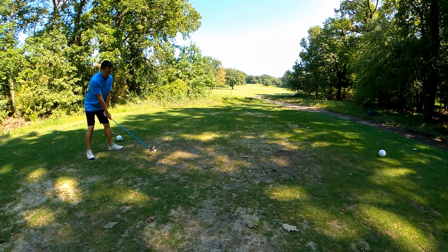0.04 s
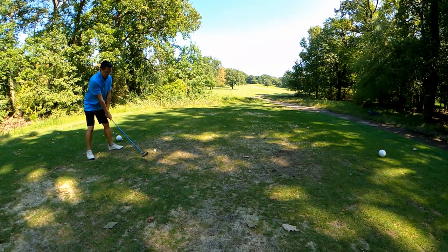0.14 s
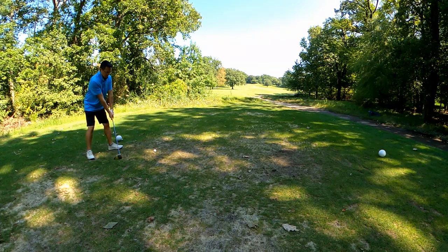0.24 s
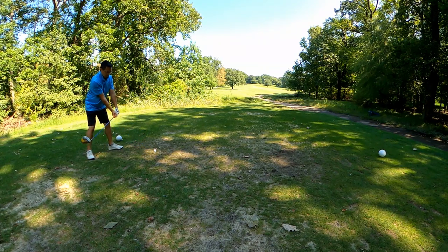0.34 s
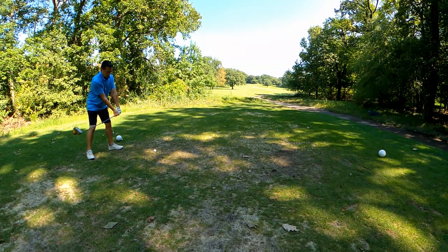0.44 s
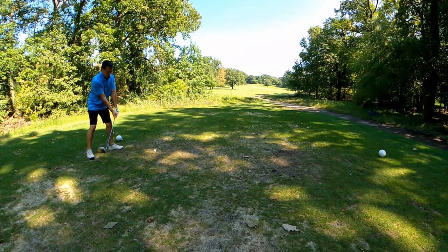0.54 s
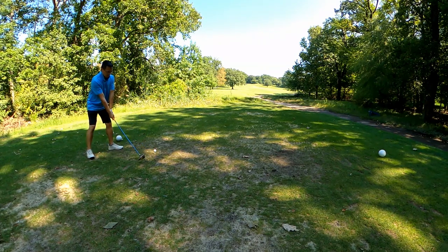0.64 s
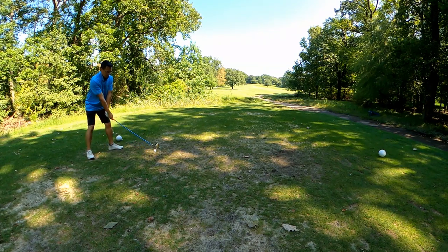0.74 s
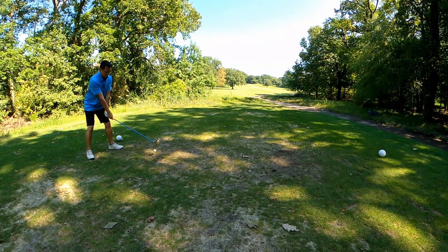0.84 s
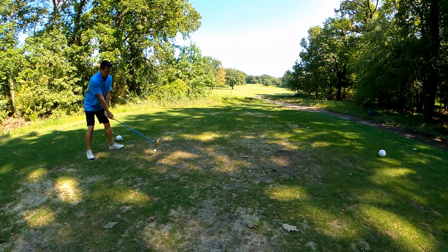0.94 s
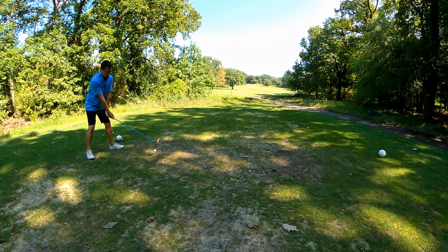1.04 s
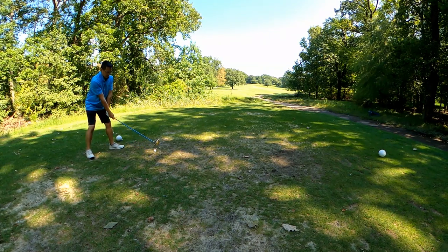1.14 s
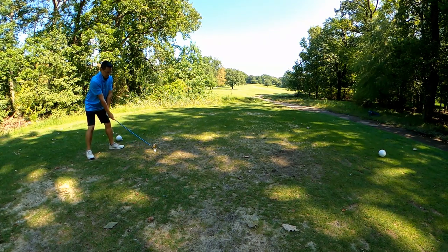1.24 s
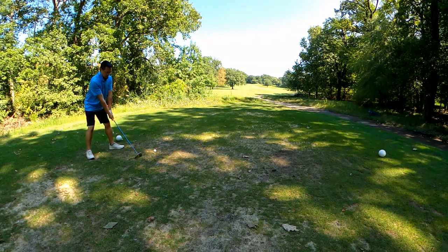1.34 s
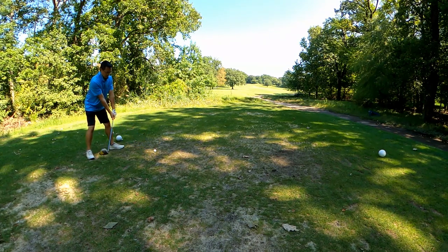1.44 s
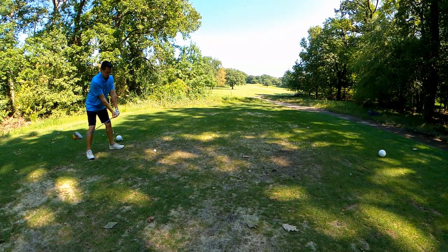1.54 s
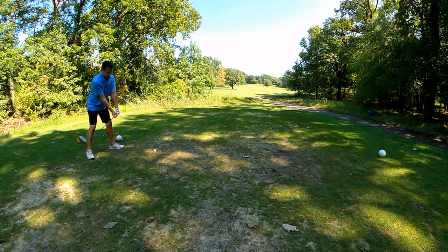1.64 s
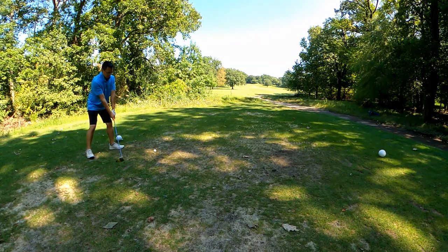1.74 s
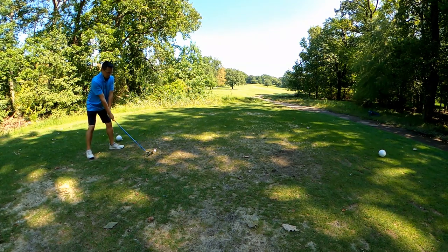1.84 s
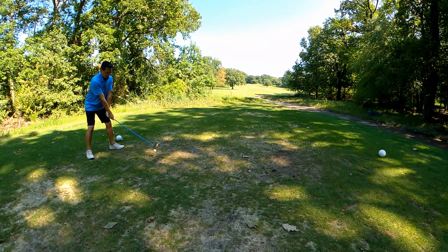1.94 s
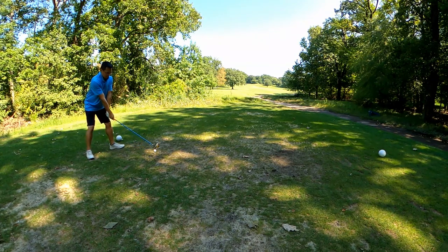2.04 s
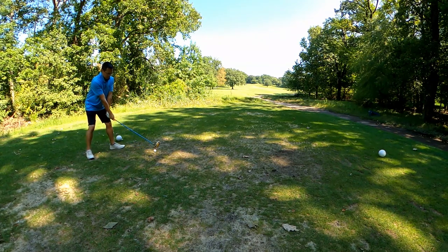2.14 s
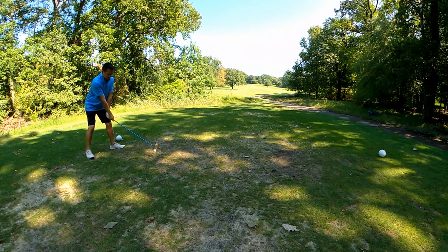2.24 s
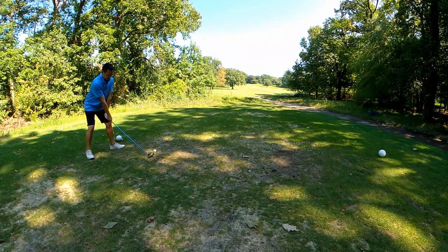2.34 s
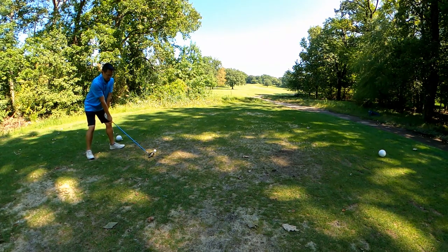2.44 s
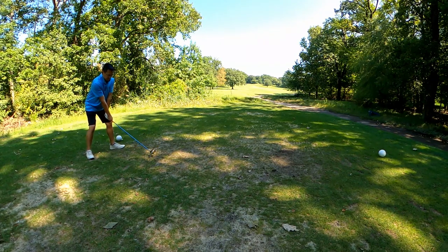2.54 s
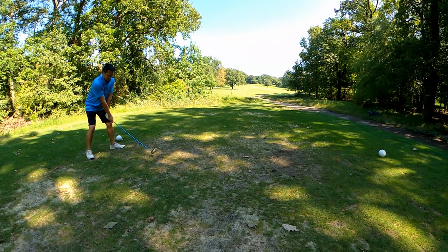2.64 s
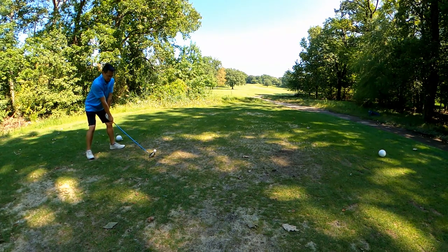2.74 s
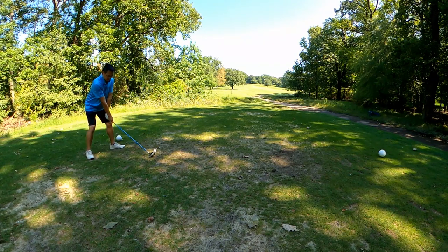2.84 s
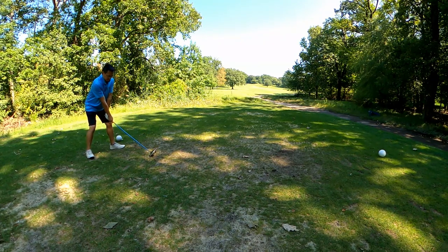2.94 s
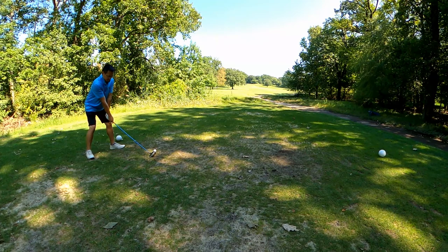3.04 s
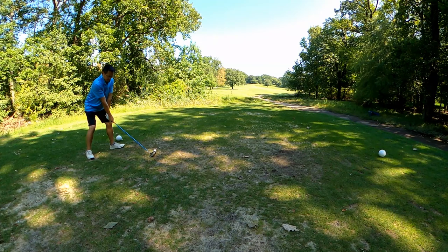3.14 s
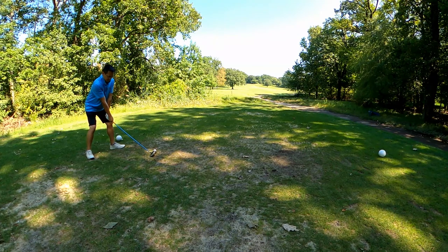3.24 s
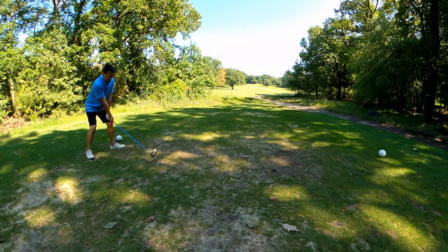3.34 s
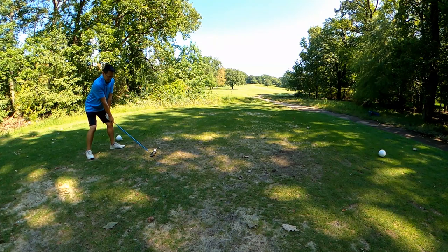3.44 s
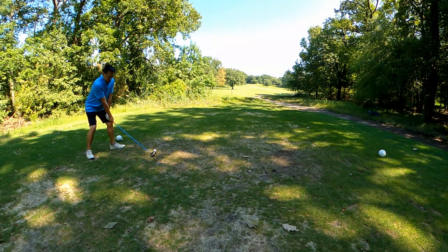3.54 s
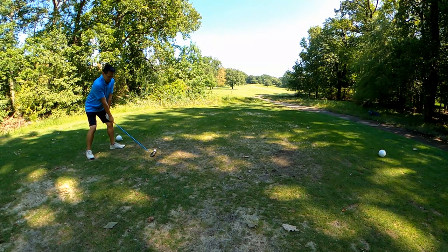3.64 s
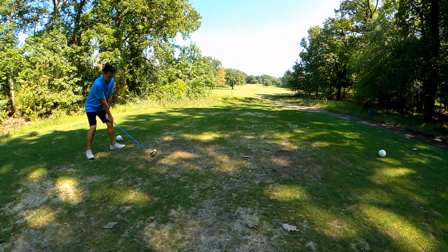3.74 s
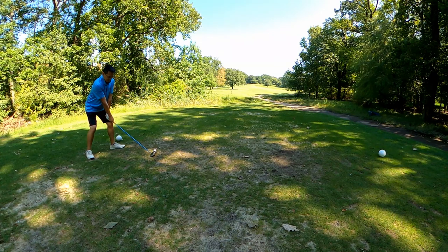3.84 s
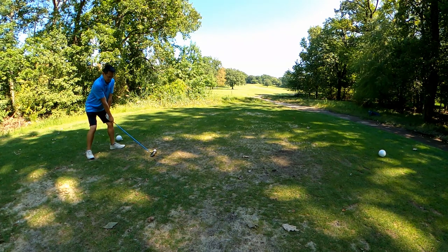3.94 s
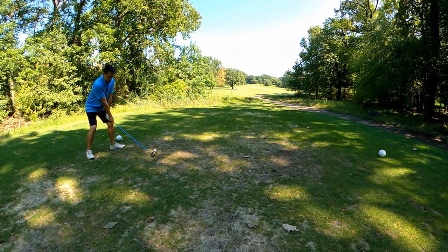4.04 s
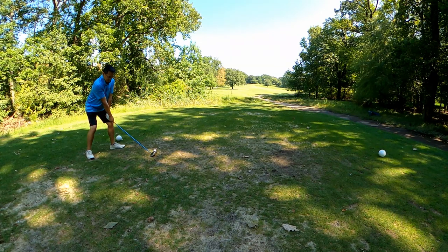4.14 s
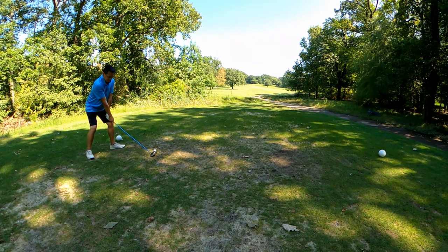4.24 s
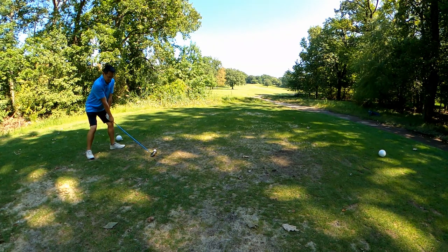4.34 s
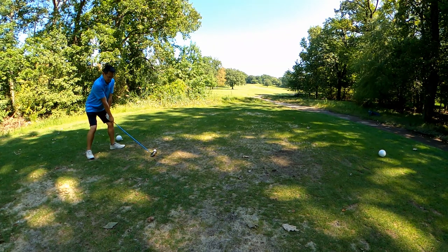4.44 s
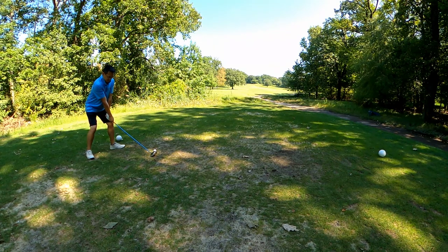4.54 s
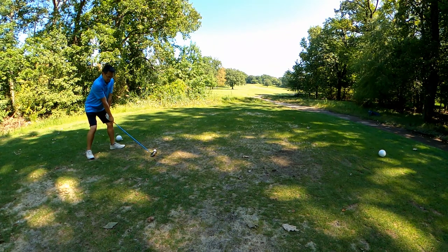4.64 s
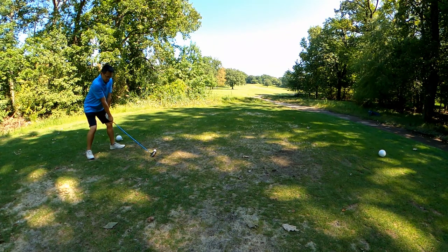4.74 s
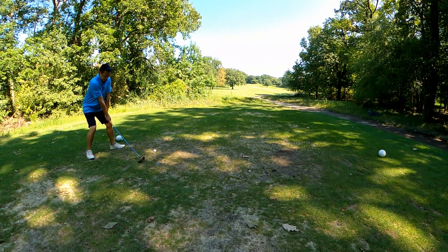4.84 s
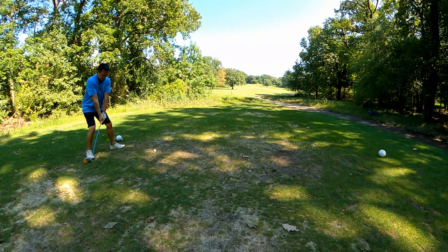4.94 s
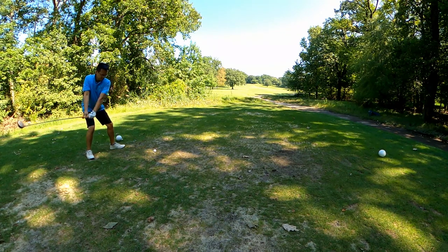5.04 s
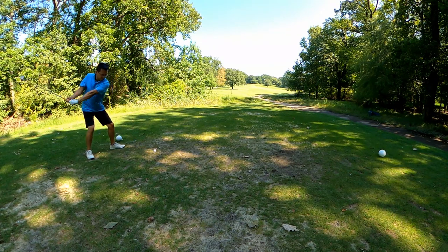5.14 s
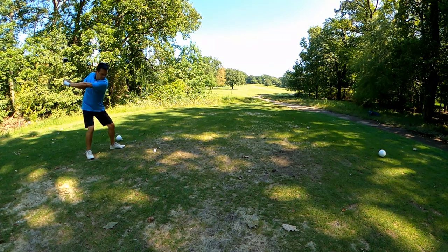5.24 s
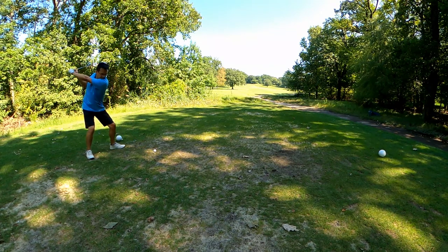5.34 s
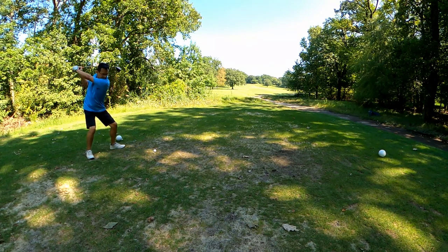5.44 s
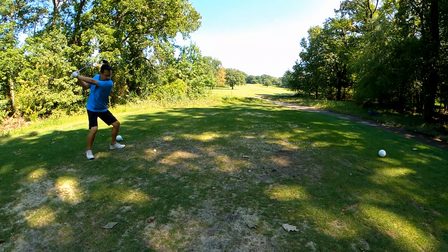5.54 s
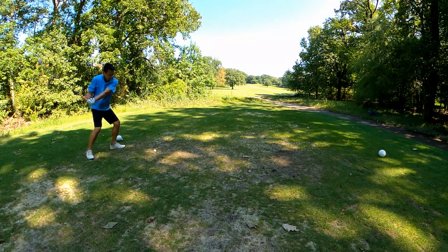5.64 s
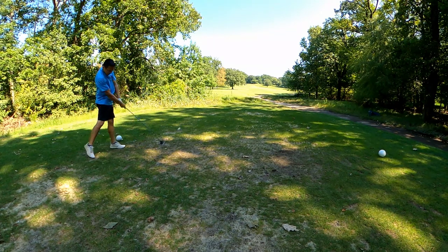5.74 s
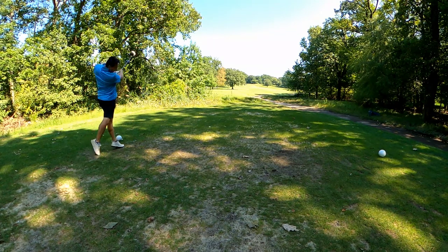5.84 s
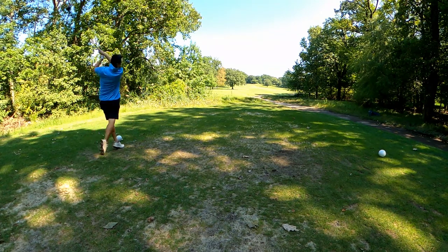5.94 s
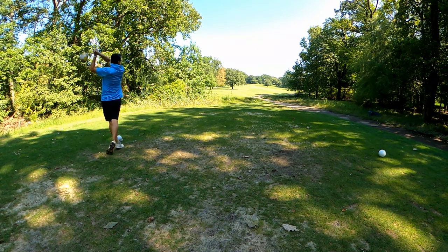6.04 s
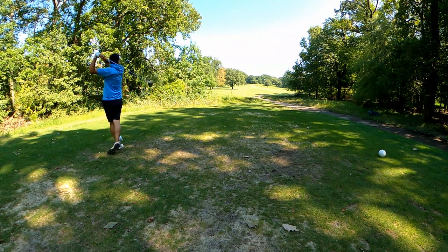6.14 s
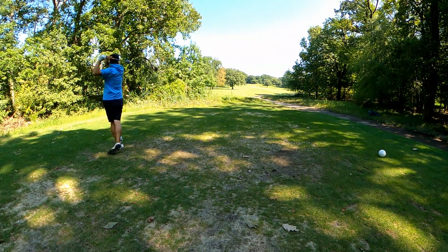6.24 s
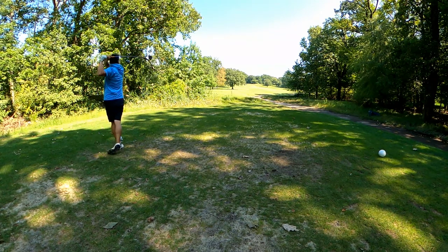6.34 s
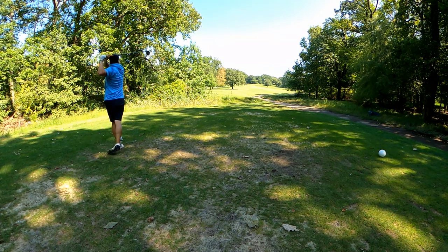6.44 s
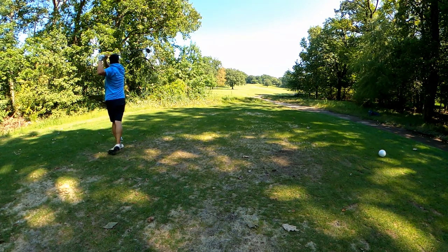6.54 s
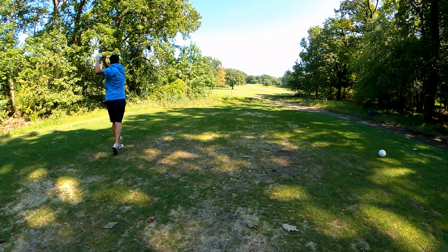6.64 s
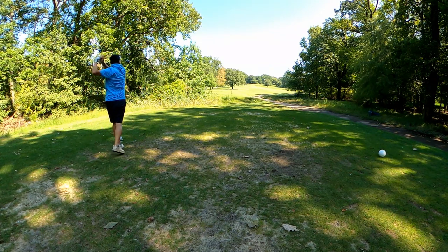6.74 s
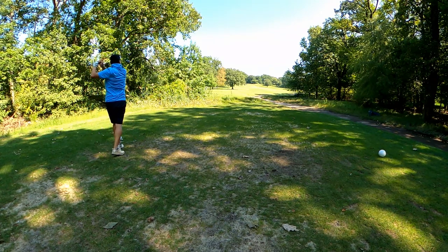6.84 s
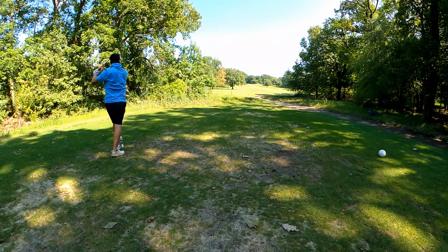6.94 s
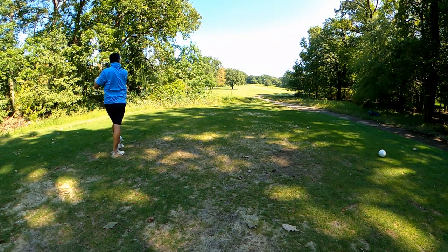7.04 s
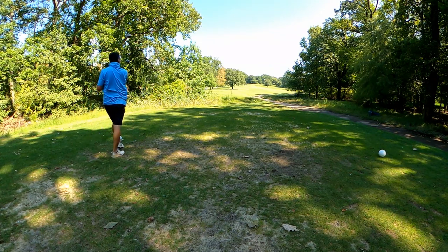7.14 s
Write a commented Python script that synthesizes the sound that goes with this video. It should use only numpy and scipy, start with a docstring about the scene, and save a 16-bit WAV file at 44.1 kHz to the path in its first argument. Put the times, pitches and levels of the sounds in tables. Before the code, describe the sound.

Insects and faint traffic hum over a quiet wooded tee; a club taps the turf, swishes, and cracks a golf ball, echoing off trees.

```python
"""Golf drive in the woods

A driver taps the turf, swishes through the air and hits the ball with one sharp crack.
Fading tones make the taps and the ringing metal head; shaped noise makes the crack and swish.
A soft hiss surrounds the hit, and a low, wide thump comes with it.
Trees return the crack as a grainy wash and a few dull slaps. Behind it are insects and stirring leaves,
far engines and tyres made from noise, a wavering engine drone, and faint distant whistles."""
import sys
import numpy as np
from scipy.fft import rfft, irfft, next_fast_len
from scipy.io import wavfile
from scipy.ndimage import map_coordinates

SR = 44100
rng = np.random.default_rng(int(sys.argv[2]) if len(sys.argv) > 2 else 0)


def master_out(mix):
    """Clip the mix to full scale and print it as 16-bit PCM to the path in sys.argv[1]."""
    frames = np.transpose(np.atleast_2d(mix))
    ceiling = np.clip(frames, -1, 1)
    pcm = np.round(ceiling * 32767).astype(np.int16)
    wavfile.write(sys.argv[1], SR, pcm)


N = 317520  # samples: 7.2 s

# In these tables levels are relative, and a fade time is the time to fall by 60 dB.
# Colour of the far engines: (frequency [Hz], level [dB])
ENGINE_COLOUR = [(15, -16.5), (25, -10), (55, 1), (90, 1), (125, -2), (160, -3.5), (210, -11), (270, -19.5),
                 (380, -25), (600, -42), (1500, -83.5)]
# Colour of the far tyres: (frequency [Hz], level [dB])
TYRE_COLOUR = [(150, -7.5), (400, 0.5), (600, 1), (900, -0.5), (1150, 3.5), (1450, 2.5), (2000, -5),
               (2800, -11.5), (4200, -32.5), (8000, -61)]
# Far traffic going by: (time when nearest [s], time until 3 dB down [s], level [dB])
ENGINE_PASS = (2.7, 3.68, -39)
TYRE_PASS = (1.2, 5.44, -57.5)
# Stereo width of the background: (frequency [Hz], side level [dB])
BACKGROUND_WIDTH = [(25, -18), (70, -30.5), (150, -27.5), (400, -14), (950, -15.5), (1450, -3.5),
                    (2500, -3.5), (4000, -5), (8000, -5.5)]
# Colour of the stirring leaves: (frequency [Hz], level [dB])
LEAF_COLOUR = [(1200, -26.5), (2400, -1.5), (3200, 3), (4000, 1.5), (5500, 1.5), (8000, -15), (9500, -53),
               (12000, -56)]
# Gusts that stir the leaves: (peak time [s], half length [s], level [dB])
GUSTS = [(.45, 1.3, -61), (2.04, 0.27, -60), (7.1, 1.85, -64)]
# Swells of a far engine's drone: (peak time [s], half length [s], level [dB])
DRONE_SWELLS = [(1.05, 0.71, -50), (2.33, 0.35, -41.5), (3.2, 0.43, -40.5), (4.1, 0.56, -37.5)]
# Partials of the drone: (multiple of its pitch [times], level [dB])
DRONE_PARTIALS = [(1, 0.5), (1.5, -14), (3.1, -25.5)]
# Colour of the insect chorus: (frequency [Hz], level [dB])
CHORUS_COLOUR = [(3500, -67), (4700, -21), (5250, -10), (5850, -14.5), (6080, -0.5), (6550, 0.5),
                 (6800, -2), (7170, 3.5), (7450, -0.5), (7850, 0.5), (8100, -14), (8500, -19.5),
                 (9300, -46.5), (11000, -80)]
# Close-pitched singers that stand out of the chorus: (frequency [Hz], level [dB])
SINGERS = [(6555, -65), (7165, -65.5)]
# Colour of one insect's rasp: (frequency [Hz], level [dB])
RASP_COLOUR = [(2200, -23), (2900, -6.5), (3100, 4), (3330, 6), (3550, -7), (3900, 6.5), (4150, -13.5),
               (5000, -46.5)]
# Swells of that rasp: (peak time [s], half length [s], level [dB])
RASP_SWELLS = [(.5, 0.78, -67), (1.8, 1, -72)]
# Faint distant whistles: (time [s], frequency [Hz], level [dB])
WHISTLES = [(1.672, 1438, -48.5), (1.99, 1445, -48.5), (3.06, 1100, -48.5), (3.45, 1105, -56)]
# The club touching the turf: (time [s], thud level [dB], tick level [dB], ring level [dB])
TAPS = [(2.5079, -19, -32.5, -48), (2.862, -32.5, -44.5, -55), (3.174, -50, -51, -70),
        (3.431, -53, -53, -70)]
# Tones of the sole on the ground: (frequency [Hz], level [dB], fade time [s])
THUD_TONES = [(202, -1, 0.027), (288, 7, 0.026), (433, -2, .028)]
# Colour of the ticking dry grass: (frequency [Hz], level [dB])
TICK_COLOUR = [(300, -20), (1200, 10), (2000, 0.5), (3000, 3), (4500, -5), (6400, 2), (8000, -5),
               (10500, -1.5), (12000, -40)]
# Tones of the head damped by grass: (frequency [Hz], level [dB], fade time [s])
GROUNDED_HEAD_TONES = [(2750, -2.5, 0.098), (3020, -7, 0.05), (3400, -11, 0.063), (3970, -5.5, 0.062)]
# Colour of the shaft's air noise when shedding at 700 Hz: (frequency [Hz], level [dB])
VORTEX_COLOUR = [(60, -13), (190, -2.5), (350, -11.5), (500, -5), (620, 1), (720, -3), (850, -12.5),
                 (1100, -11), (1600, -17), (2500, -26), (5000, -31), (8000, -54.5), (12000, -91)]
# Colour of a short hiss around the hit: (frequency [Hz], level [dB])
HISS_COLOUR = [(800, -31), (2000, -5), (4000, -1.5), (7000, -2.5), (10500, -4), (11500, -30.5),
               (14000, -60)]
# Dull body of the blow: (frequency [Hz], level [dB], fade time [s])
KNOCK_TONES = [(565, -1.5, .006), (353, -11, 0.012), (213, -18, 0.025)]
# Low overload thump at the hit: (frequency [Hz], level [dB])
THUMP_COLOUR = [(15, -2.5), (45, 0.5), (130, -3.5), (250, -12), (500, -25), (1500, -60)]
# Hard-driven tones of the face: (frequency [Hz], level [dB], fade time [s])
FACE_TONES = [(3820, 4, 0.018), (4820, 1, 0.03), (5420, 2, .022), (6700, -4, 0.024), (8760, -11, 0.034),
              (9800, -24, 0.0206), (10820, -15.5, 0.036)]
# Colour of the crack: (frequency [Hz], level [dB])
CRACK_COLOUR = [(300, 0), (1400, 1), (2000, -16.5), (3000, -10), (4000, -6), (5500, -5.5), (7000, -5),
                (8200, -6.5), (10800, -11), (11600, -42), (14000, -58)]
# Densely packed tones of the thin crown, as one colour: (frequency [Hz], level [dB])
CROWN_COLOUR = [(300, -19), (1200, -11.5), (2000, -14), (3200, -8.5), (4000, -8.5), (5800, -0.5),
                (7000, -8.5), (8300, -7.5), (10700, -9), (11500, -46), (14000, -70.5)]
# Tones heard as the head rings, and one thin very high whine that sounds along with them, before their pitch
# bends: (frequency [Hz], level [dB], fade time [s])
RINGING_TONES = [(2530, -2.5, 0.18), (2610, -8.5, 0.16), (3560, -3, 0.29), (4380, -2.5, 0.14),
                 (4985, -2, .09), (5600, -4.5, 0.14), (5700, -5, .12), (6000, -2, 0.15), (6500, -10, .1),
                 (7400, 1.5, 0.069), (9820, -14, .08), (12200, -14, 0.06)]
# Colour of the crack scattered by the woods: (frequency [Hz], level [dB])
ECHO_COLOUR = [(150, -12), (400, -10.5), (700, -3), (1300, 1), (2000, -2.5), (2700, -0.5), (3300, -2),
               (3900, 4.5), (4700, 0), (5800, 2.5), (6250, 7), (6800, -4), (8500, -4), (10200, -11.5),
               (11500, -52)]
# Big trunks that return the crack on their own: (delay [s], level [dB])
TRUNKS = [(.083, -43), (.174, -27), (.287, -34.5)]

CALM_DB = -71  # the leaves between gusts
DRONE_HZ = 108.3
RASP_PULSES_PER_S, RASP_QUICKENING_PER_S2 = 14.5, 2
WHISTLE_RISE_S, WHISTLE_T60_S = .07, 0.79
# the moment of top speed, and how long the club takes to gain and lose it
FASTEST_S, SPEED_UP_S, SLOW_DOWN_S = 5.851, .042, .046
VORTEX_HZ, SWISH_DB = 778, -26.5  # pitch and level at top speed
SWISH_POWER = 3.8  # sound pressure grows as this power of the speed
IMPACT_S = 5.8867
GRASS_DB, GRASS_T60_S = -40, .3  # early scatter from the turf and bushes
NEAR_TREES_S, FAR_TREES_S = 0.067, .18  # echo delays of the nearest trees and the far tree line
WOODS_DB, WOODS_RISE_S, WOODS_T60_S = -38.5, 0.014, 0.7
TOP_HZ = 13100  # little is kept above this


def amp(db):
    """Turn decibels into gain."""
    return 10 ** (np.asarray(db) / 20)


def unit(x):
    """Scale to an rms (average strength) of 1."""
    return x / np.sqrt(np.mean(x ** 2) + 1e-20)


def along(points, hz):
    """Read values between (frequency, value) points, spacing frequency by ratio as the ear does."""
    f, v = np.transpose(points)
    return np.interp(np.log(hz + 1), np.log(f + 1), v)


def since(s):
    """Seconds since a moment, zero before it."""
    return np.maximum(np.arange(N) / SR - s, 0)


def phase_of(hz):
    """Add up a changing frequency into the running phase of a tone."""
    return 2 * np.pi * np.cumsum(hz) / SR


def wobble(rate):
    """A smooth random curve through `rate` random points a second."""
    knots = rng.standard_normal(int(N * rate / SR) + 4)
    return map_coordinates(knots, [np.arange(N) * rate / SR])


def filtered(x, response):
    """Change the strength (and perhaps phase) of each frequency in x."""
    padded = next_fast_len(N + SR // 2)
    spectrum = rfft(x, padded) * response(np.fft.rfftfreq(padded, 1 / SR))
    return irfft(spectrum, padded)[..., :N]


def pan(left_db):
    """Gains that make the left channel left_db louder than the right."""
    return amp([[left_db / 2], [-left_db / 2]])


def noise(spectrum, side_db):
    """Coloured stereo noise of rms 1; side_db, one value or (Hz, dB) points, sets its width."""
    mid, side = filtered(rng.standard_normal((2, N)), lambda hz: amp(along(spectrum, hz)))
    if np.ndim(side_db):
        side = filtered(side, lambda hz: amp(along(side_db, hz)))
    else:
        side = amp(side_db) * side
    return unit(np.array([mid + side, mid - side]))


def decay(t, t60, attack):
    """A quick rise, then a fade that loses 60 dB in t60 seconds."""
    fade = np.exp(-np.log(1000) * np.minimum(t / t60, 10))
    return fade * (1 - np.exp(-t / attack))


def ring(modes, t, attack, spread=0):
    """Fading tones of a struck object; spread [radians] shifts each tone's phase between channels."""
    out = np.zeros((2, N))
    live = (t > 0) & (t < .5)
    for hz, db, t60 in modes:
        phase = spread * rng.choice([-1, 1]) * np.array([[1], [-1]])
        tone = np.sin(2 * np.pi * hz * t[live] + phase)
        out[:, live] += amp(db) * decay(t[live], t60, attack) * tone
    return out


def passing(nearest_s, width_s, db):
    """Gain of a source going by on a straight road: one over its distance."""
    return amp(db) / np.hypot(1, (since(0) - nearest_s) / width_s)


def swells(rows):
    """Gain of bell-shaped swells that add in power."""
    power = 0
    for s, half, db in rows:
        bell = amp(db) * np.exp(-((since(0) - s) / half) ** 2)
        power = power + bell ** 2
    return np.sqrt(power)


def background():
    """Far engines and tyres pass as noise, an engine drones in tones, and gusts stir the leaves."""
    rumble = passing(*ENGINE_PASS) * amp(0.65 * wobble(5)) * noise(ENGINE_COLOUR, BACKGROUND_WIDTH)
    tyres = passing(*TYRE_PASS) * amp(0.7 * wobble(5.5)) * noise(TYRE_COLOUR, BACKGROUND_WIDTH)
    stirring = np.hypot(amp(CALM_DB), swells(GUSTS))
    leaves = stirring * amp(.7 * wobble(12)) * noise(LEAF_COLOUR, BACKGROUND_WIDTH)
    turning = phase_of(DRONE_HZ + 2.22 * wobble(9))
    drone = sum(amp(db + 2.0 * wobble(12)) * np.sin(k * turning) for k, db in DRONE_PARTIALS)
    return rumble + tyres + leaves + swells(DRONE_SWELLS) * drone


def insects():
    """A steady high chorus with two thin tones in it, and a lower rasp that pulses in two swells."""
    chorus = amp(-52 + 0.36 * wobble(14)) * noise(CHORUS_COLOUR, side_db=-6.5) * pan(left_db=-0.5)
    singers = 0
    for hz, db in SINGERS:
        tone = np.sin(phase_of(hz + 18 * wobble(90)))
        singers = singers + amp(db + 2.8 * wobble(20)) * tone
    pulses = np.sin(phase_of(RASP_PULSES_PER_S + RASP_QUICKENING_PER_S2 * since(0)))
    rasp = swells(RASP_SWELLS) * amp(5.5 * pulses) * noise(RASP_COLOUR, side_db=-12.5)
    return chorus + singers + rasp


def whistles():
    """Thin far tones swell and linger, their pitch and level blurred on the way through the trees."""
    waver = phase_of(14 * wobble(70))
    notes = 0
    for s, hz, db in WHISTLES:
        t = since(s)
        tone = np.sin(2 * np.pi * hz * t + waver)
        notes = notes + amp(db) * decay(t, WHISTLE_T60_S, WHISTLE_RISE_S) * tone
    return notes * amp(1.8 * wobble(30))


def taps():
    """The sole thuds on the turf, dry grass ticks and the damped head rings a little."""
    out = np.zeros((2, N))
    grass = noise(TICK_COLOUR, side_db=-9)
    for s, thud_db, tick_db, ring_db in TAPS:
        t = since(s)
        out += amp(thud_db - 7.0) * ring(THUD_TONES, t, attack=0.0013)
        snap = decay(t, t60=0.012, attack=.0001)
        rustle = amp(-17) * decay(t, t60=0.16, attack=0.00075)
        out += amp(tick_db) * grass * (snap + rustle)
        out += amp(ring_db) * ring(GROUNDED_HEAD_TONES, t, attack=0.00034, spread=.3)
    return out


def swish():
    """Swirls of air peel off the shaft: the faster it moves, the higher and louder they sing."""
    t = since(0) - FASTEST_S
    speed = 1 / np.hypot(1, t / np.where(t < 0, SPEED_UP_S, SLOW_DOWN_S))  # share of the top speed
    vortex_hz = VORTEX_HZ * speed
    # read the noise faster or slower, so that its whole colour follows the speed
    travel = np.cumsum(vortex_hz) / 700
    steady_air = noise(VORTEX_COLOUR, side_db=-17.5)
    air = np.array([map_coordinates(channel, [travel], mode="wrap") for channel in steady_air])
    # the fast tip sheds swirls regularly enough to give a rough tone
    tone = amp(2 * wobble(150)) * np.sin(phase_of(vortex_hz * (1 + .06 * wobble(250))))
    return amp(SWISH_DB) * speed ** SWISH_POWER * (amp(-3.0) * air + amp(-4.0) * tone)


def hiss_around_hit():
    """A brief soft hiss swells into the hit and fades after it."""
    nearness = np.exp(-np.abs(since(0) - IMPACT_S) / 0.013)
    return amp(-28.0) * nearness * noise(HISS_COLOUR, side_db=-4)


def strike():
    """The ball's brief push, the face's crack and the head's ring, with a low, wide thump."""
    t = since(IMPACT_S)
    # the ball squashes and springs off: the push peaks after two thirds of a millisecond
    contact = t / .00033
    push = contact ** 2 * np.exp(-contact) * np.sin(2 * np.pi * 1300 * t)
    knock = amp(0.5) * ring(KNOCK_TONES, t, attack=0.00048)
    # the loud hit overloads the channels unequally: a low, wide thump, made here from noise
    thump = amp(-15) * decay(t, t60=.06, attack=.001) * noise(THUMP_COLOUR, side_db=13)
    face = amp(-11.0) * ring(FACE_TONES, t, attack=0.00087, spread=0.34)
    crack = amp(-5) * decay(t, t60=.017, attack=0.00047) * noise(CRACK_COLOUR, side_db=-8)
    crown = amp(-20.5) * decay(t, t60=0.096, attack=.002) * noise(CROWN_COLOUR, side_db=-2)
    # the head flies away, then curves upward: its Doppler shift bends the pitch up by as much as 8 %
    doppler = 1 + .04 * (1 - np.cos(np.minimum(17 * t, np.pi)))
    bent_time = np.cumsum(doppler * (t > 0)) / SR
    # the ring flutters as the head turns above the reflecting ground
    flutter = amp(-25.5 + 2.4 * wobble(130))
    ringing = flutter * ring(RINGING_TONES, bent_time, attack=0.0019, spread=0.26)
    return push - knock + thump + (face + crack + crown + ringing) * pan(left_db=1.3)


def woods(blow):
    """Countless leaves and twigs return the crack as a grainy wash; a few trunks add duller slaps."""
    # turf and bushes round the tee scatter the crack at once
    nearby = amp(GRASS_DB) * decay(since(IMPACT_S), GRASS_T60_S, attack=.004)
    nearby = nearby * noise(ECHO_COLOUR, side_db=-4.5)
    # the wash starts with the nearest trees, holds up to the far tree line and then dies away
    rise = 1 - np.exp(-since(IMPACT_S + NEAR_TREES_S) / WOODS_RISE_S)
    fall = np.exp(-np.log(1000) * since(IMPACT_S + FAR_TREES_S) / WOODS_T60_S)
    grain = amp(WOODS_DB + 1.5 * wobble(260))
    wash = rise * fall * grain * noise(ECHO_COLOUR, side_db=-8.0) * pan(left_db=-0.8)
    # later echoes have crossed more air and foliage, and lose their treble
    far = 1 - np.exp(-(since(IMPACT_S) / 0.26) ** 2)
    dull_wash = filtered(wash, lambda hz: 1 / (1 + (hz / 7300) ** 8))
    wash = (1 - far) * wash + far * amp(3) * dull_wash
    # long waves bend round a trunk, short ones scatter on its bark
    returned = filtered(blow, lambda hz: 1j * hz / (450 + 1j * hz) / (1 + 1j * hz / 5000) ** 2)
    slaps = sum(amp(db) * np.roll(returned, round(delay * SR), axis=1) for delay, db in TRUNKS)
    return nearby + wash + slaps


def scene():
    """Add up everything heard from behind the tee."""
    blow = strike()
    swing = swish() + hiss_around_hit()
    return background() + insects() + whistles() + taps() + swing + blow + woods(blow)


def record(dry):
    """Round off the highest peaks smoothly, then cut steeply above TOP_HZ."""
    rounded = dry / (1 + np.abs(dry / .95) ** 6) ** (1 / 6)
    return filtered(rounded, lambda hz: 1 / np.sqrt(1 + (hz / TOP_HZ) ** 80))


dry = scene()
out = record(dry)
master_out(out)
```